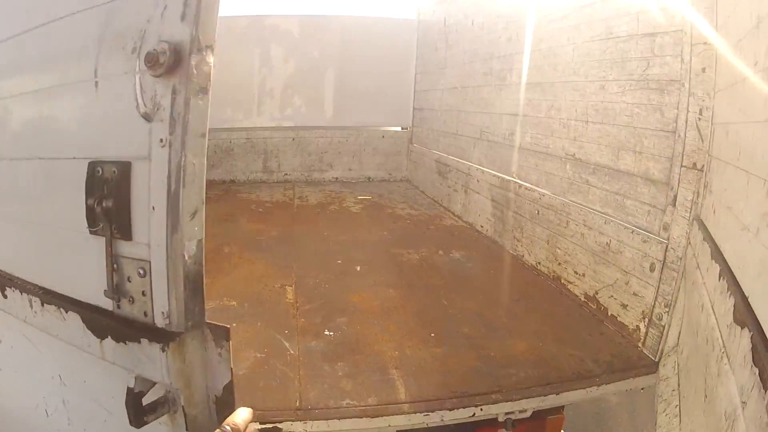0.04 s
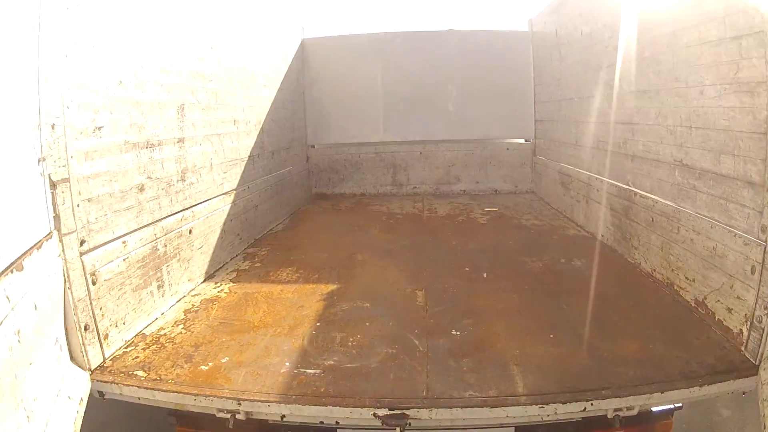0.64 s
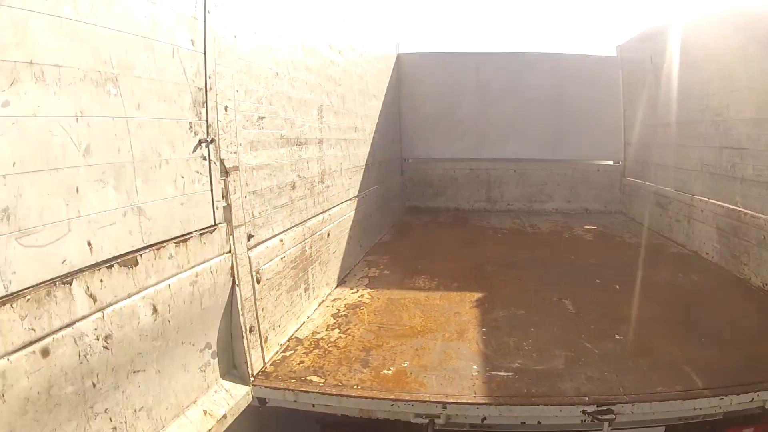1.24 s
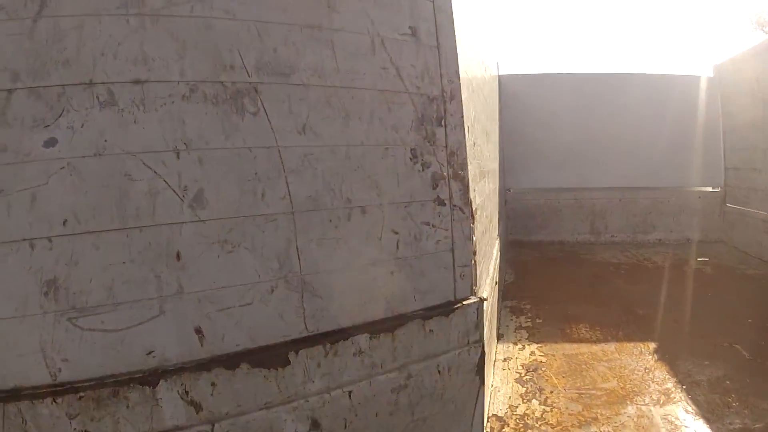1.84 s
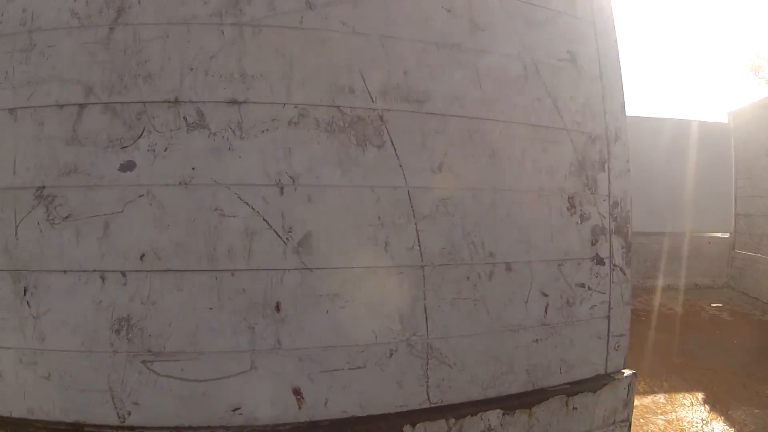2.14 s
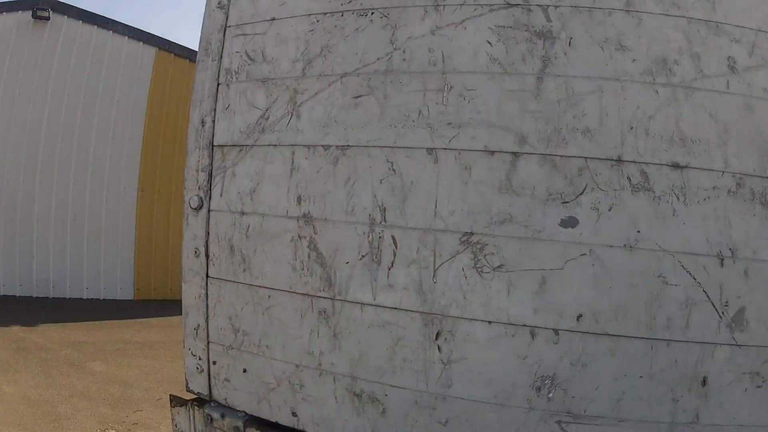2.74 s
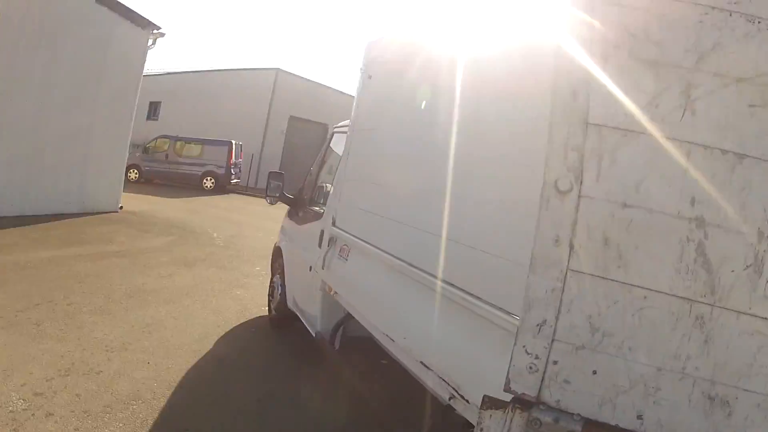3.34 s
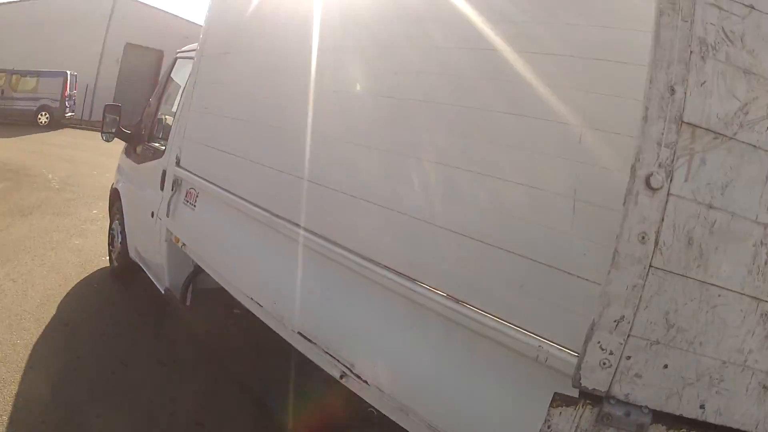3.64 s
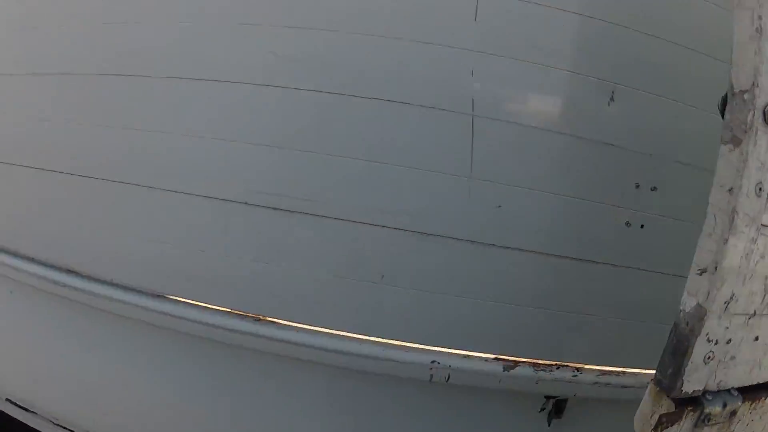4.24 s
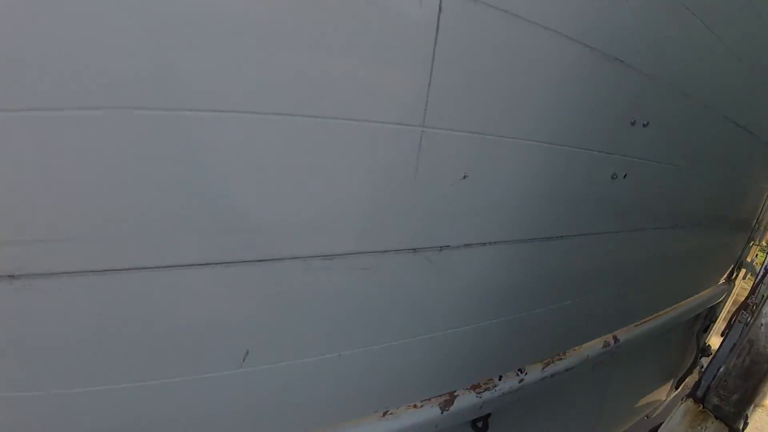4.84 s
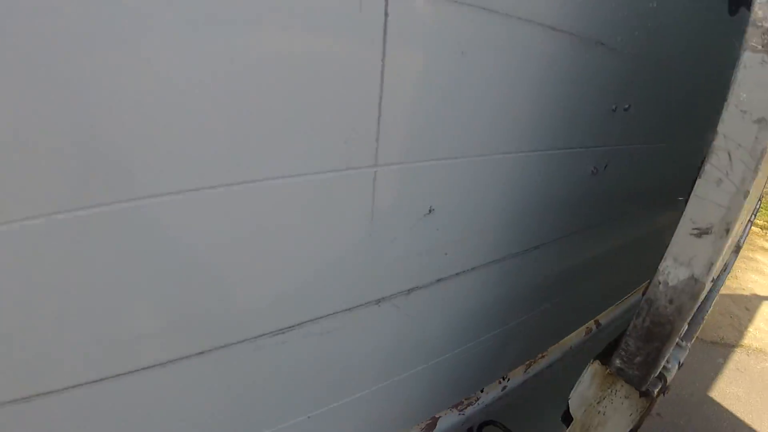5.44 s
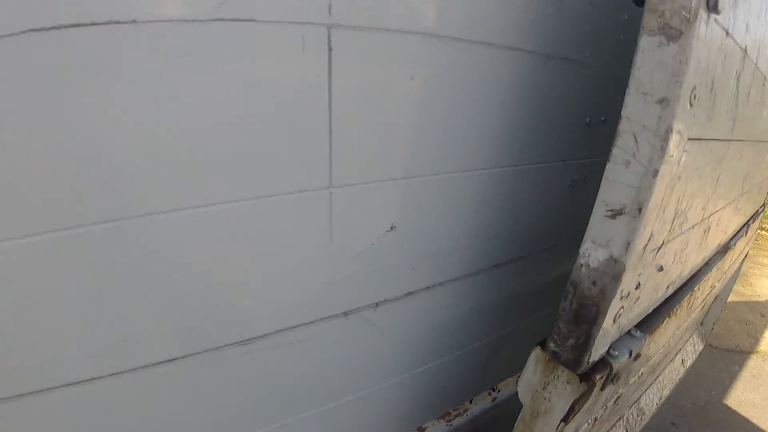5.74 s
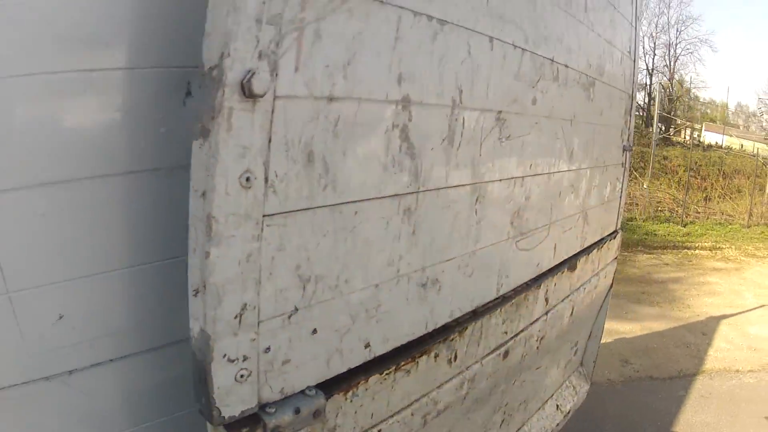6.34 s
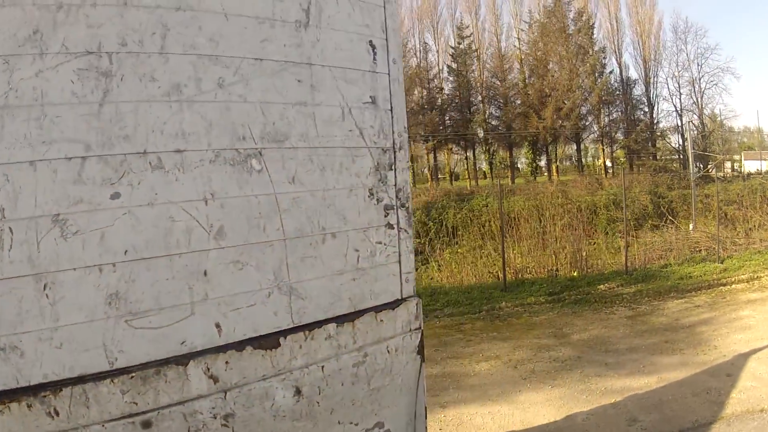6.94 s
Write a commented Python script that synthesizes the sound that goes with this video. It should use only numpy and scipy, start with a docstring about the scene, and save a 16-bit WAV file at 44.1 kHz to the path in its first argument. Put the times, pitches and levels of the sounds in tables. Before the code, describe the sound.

In a quiet yard, a truck's steel rear doors are unlatched close by: small clicks, a ringing bolt clank, a dull knock and a sharp snap. Someone walks a door open, each step a deep thump in the handheld microphone with a faint crunch of grit. The hinge grinds briefly, then the door bounces on its catch with a quick metallic chatter and a low boom, over a soft open-air rumble.

```python
"""A latch clicks and a steel bolt clanks home: a tipper truck's rear doors are being swung open
and latched back in a quiet yard. Each impact excites the damped modes of panels, bolt or hook,
and the empty load box reverberates. Hinges rub and grind by friction; flexing sheet steel booms.
Footfalls crunch on grit and thump through a small hand-carried camera, whose case resonances
colour everything, down to the steady rumble and hiss of the open air."""
import sys
import numpy as np
from scipy import signal
from scipy.fft import rfft, irfft
from scipy.io import wavfile

SR = 44100
rng = np.random.default_rng(int(sys.argv[2]) if len(sys.argv) > 2 else 0)


def wrap_up_sound(samples):
    """Save the sound to the file named by the first command line argument, as 16-bit audio."""
    columns = np.atleast_2d(samples).T
    # keep every value between -1 and 1, then stretch to whole-number steps
    tamed = np.clip(columns, -1, 1)
    steps = np.round(tamed * 32767).astype(np.int16)
    wavfile.write(sys.argv[1], SR, steps)


N = 308700
T = np.arange(N) / SR
HIT_T = T[:27000]   # time axis of one impact

# rattle spectrum of latch, bolt and hinge: f/Hz, relative density/dB
STEEL_SPECTRUM = [(120, -17.5), (450, -13.5), (750, -2), (950, -14.5), (1150, -1.5), (1450, -9), (1900, -3),
                  (2450, -2.5), (3000, -5), (3700, -5), (4300, -13.5), (7300, -14), (9400, -16.5),
                  (15500, -21)]
# modes of the door struck at the latch: f/Hz, level/dB, T60/s
DOOR_MODES = [(753, -24, 0.5), (1020, -26, 0.4), (1101.4, -13, 0.47), (1654, -18.5, .2), (1698, -13, 0.13),
              (1790, -13.5, 0.48), (2080, -15, .17), (2344, -13, 0.25), (2600, -12.5, .24),
              (2889, -21.5, 0.21), (3240, -19, 0.093), (3600, -19, .27), (8400, -26.5, 0.18),
              (9450, -28.5, 0.22), (10100, -34, 0.42)]
# the bolt hits its stop and rebounds: t/s, level/dB
BOLT_IMPACTS = [(.3695, -30.5), (.387, -40), (.451, -44.5)]
def bolt(free_s=.319, free_db=-41.5, slip_s=.345, gap_s=.0061, slip_db=-32.5, growth_db=.5):
    """Stick-slip friction: the bolt breaks free, slides in ever harder jerks and hits its stop."""
    out = np.zeros(N)
    release = contact(STEEL_SPECTRUM, DOOR_MODES, t60=.5, part_hz=2730, part_db=5, bass_db=-.5,
                      treble_db=-2, modes_db=2, box_db=-21, crack_db=-10.5, bolt_db=4.5)
    add(out, free_s, from_db(free_db) * release)
    for k in range(4):
        slip = contact(STEEL_SPECTRUM, DOOR_MODES, t60=.14, part_hz=2700, part_db=7.5, bass_db=.5,
                       treble_db=.5, modes_db=-2.5, box_db=-17, crack_db=-11.5, bolt_db=-2)
        add(out, slip_s + k * gap_s, from_db(slip_db + k * growth_db) * slip)
    for s, db in BOLT_IMPACTS:
        stop = contact(STEEL_SPECTRUM, DOOR_MODES, t60=.13, part_hz=750, part_db=6.5, bass_db=4.5,
                       treble_db=2, modes_db=2, box_db=-14, crack_db=-11.5)
        add(out, s, from_db(db) * stop)
    return out


# latch snaps, and one dull knock at 0.1455 s: t/s, level/dB, rattle T60/s, struck part f/Hz, bass/dB,
# treble/dB, hook/dB
LATCH_SNAPS = [(.086, -48.5, 0.12, 2830, 7, 2.5, -7), (.1455, -54, 0.046, 850, 16, -9, -24),
               (.568, -45.5, 0.19, 2600, -9, -1.5, 2), (1.7192, -33, 0.15, 1950, -2, -5, -4.5),
               (2.0505, -58, 0.04, 2700, -8, -2.5, 5), (3.43, -60, 0.2, 1500, 7, -11, -14),
               (3.968, -57.5, 0.23, 2470, 20, -1.5, -7), (4.952, -54.5, 0.023, 3620, 6, 8, -20),
               (5.163, -53.5, 0.19, 2400, 3, 3.5, -9), (5.637, -47, 0.22, 2420, -10, -6.5, -4.5)]
# modes of the loose hook: f/Hz, level/dB, undamped T60/s
FREE_HOOK_MODES = [(2490, -1.5, 0.059), (2440, 2.5, 0.16), (2507, 1.5, 0.08), (2750, -2, 0.18),
                   (2880, -7, 0.13), (3400, -10, .1), (3603, -10, 0.12), (8250, -21, 0.12),
                   (9120, -11, 0.13), (9640, -15.5, .11), (14650, -16, .11)]
def latches(free_rattle_t60=.18):
    """Damped free vibration: a latch snaps and its hook rings; a hand damps both alike."""
    out = np.zeros(N)
    for s, db, t60, part_hz, bass_db, treble_db, hook_db in LATCH_SNAPS:
        snap = contact(STEEL_SPECTRUM, DOOR_MODES, t60, part_hz, part_db=5.5, bass_db=bass_db,
                       treble_db=treble_db, modes_db=-12, box_db=-21, crack_db=-11)
        hook_modes = [(hz, level, free * t60 / free_rattle_t60) for hz, level, free in FREE_HOOK_MODES]
        hook = ring(hook_modes, spread_db=2.5)
        add(out, s, from_db(db) * (snap + from_db(hook_db) * hook))
    return out


# rattle spectrum of the side catch: f/Hz, relative density/dB
CATCH_SPECTRUM = [(120, -24), (450, -9), (750, -6.5), (1000, -9.5), (1350, 0.5), (1600, -6.5), (1950, -2),
                  (2450, -7.5), (3000, -8.5), (3600, -8), (4500, -12), (6000, -9.5), (9000, -20),
                  (15500, -26.5)]
# modes of the door struck at the catch: f/Hz, level/dB, T60/s
DOOR_CATCH_MODES = [(1142, -17.5, 0.67), (1412, -20, 0.9), (1800, -12.5, 0.75), (1936, -3, 0.2),
                    (2230, -9, 0.28), (2350, -12, 0.45), (2870, -22, 0.45), (3350, -19, 0.32),
                    (3634, -15, 0.36), (9189, -36, .29), (9970, -25, 0.5)]
# blows on the catch: t/s, level/dB, struck part f/Hz, treble/dB
CATCH_BLOWS = [(5.762, -35, 2430, 2.5), (5.829, -37, 1886, 2.5), (5.878, -48, 1935, -5)]
# tick, main hit, shudder: delay/s, level/dB, rattle T60/s, bass/dB, treble/dB, modes/dB, load box/dB
CHATTER = [(0, -4, 0.14, -0.5, 5.5, -15, -19), (.006, 1, 0.14, -3, 2, -6, -13),
           (.017, -1.5, .22, -15.5, -1.5, -0.5, -3)]
def side_catch():
    """Inelastic rebound: the open door bounces on its catch, chattering at each weaker blow."""
    out = np.zeros(N)
    for s, db, part_hz, blow_treble_db in CATCH_BLOWS:
        for delay, touch_db, t60, bass_db, treble_db, modes_db, box_db in CHATTER:
            touch = contact(CATCH_SPECTRUM, DOOR_CATCH_MODES, t60, part_hz, part_db=10,
                            bass_db=bass_db, treble_db=blow_treble_db + treble_db,
                            modes_db=modes_db, box_db=box_db, crack_db=3.5)
            add(out, s + delay, from_db(db + touch_db) * touch)
    return out


# rattle spectrum of a door leaf: f/Hz, relative density/dB
LEAF_SPECTRUM = [(100, 4), (230, 4.5), (450, 1.5), (700, -9.5), (900, -9.5), (1200, -11.5), (1900, -15.5),
                 (2600, -19.5), (4000, -36), (8000, -46), (12000, -19), (15500, -47)]
# knocks on a leaf: t/s, level/dB, rattle T60/s, struck part f/Hz, bass/dB
LEAF_KNOCKS = [(.785, -57, .08, 592, 4), (1.112, -49, 0.29, 1770, 8), (3.31, -59.5, 0.24, 165, 13.5),
               (5.699, -32.5, 0.15, 1339, -8)]
# the leaf touches, lands and rebounds: delay/s, level/dB
LEAF_BOUNCES = [(0, -3), (.008, 1), (.04, -10.5)]
def knocks():
    """Impact with rebound: a door leaf knocks dully, barely exciting its clear modes."""
    out = np.zeros(N)
    for s, db, t60, part_hz, bass_db in LEAF_KNOCKS:
        for delay, bounce_db in LEAF_BOUNCES:
            knock = contact(LEAF_SPECTRUM, DOOR_MODES, t60, part_hz, part_db=7.5, bass_db=bass_db,
                            treble_db=-.5, modes_db=-21, box_db=-16, crack_db=2, bolt_db=-34)
            add(out, s + delay, from_db(db + bounce_db) * knock)
    return out


# modes of the bolt: f/Hz, level/dB, T60/s
STEEL_BOLT_MODES = [(4200, -10, .06), (4620, -3, .07), (5480, 0, .065), (6610, 0, .065), (7400, -3, .06),
                    (9400, -12, .06)]
# reverberation of the empty load box: f/Hz, relative density/dB
BOX_SPECTRUM = [(120, 6), (250, 9), (450, 9.5), (700, -4), (1200, 2.5), (1900, 0.5), (2500, -7.5),
                (3500, -21), (5000, -20.5), (8000, -23.5), (10300, -14), (15500, -19)]
def contact(spectrum, modes, t60, part_hz, part_db, bass_db, treble_db, modes_db, box_db, crack_db,
            bolt_db=-24, crack_t60=.018, attack_s=.002, box_swell_s=.013, box_t60=.57):
    """Impulse response of the door: a crack, a rattle, ringing modes and the reverberant load box."""
    size = len(HIT_T)
    envelope = decay(t60) * grainy(size, depth_db=1.5, grain_s=.0012)
    envelope += from_db(crack_db) * decay(crack_t60)
    rattle = noise(spectrum, size, bass_db, treble_db, part_hz, part_db) * envelope
    tones = from_db(modes_db) * ring(modes, spread_db=2.23)
    tones += from_db(bolt_db) * ring(STEEL_BOLT_MODES, spread_db=2.5)
    box = noise(BOX_SPECTRUM, size, bass_db / 2, treble_db / 2, part_hz, part_db)
    box *= decay(box_t60) * (1 - np.exp(-HIT_T / box_swell_s))
    attack = 1 - np.exp(-HIT_T / attack_s)
    return (rattle + tones + from_db(box_db) * box) * attack


# booms of the sheet steel: t/s, f/Hz, level/dB, rise/s, T60/s
SHEET_BOOMS = [(0.386, 255.3, -44, 0.014, 0.35), (1.108, 139, -36.5, 0.0064, 0.26),
               (3.306, 130, -38, 0.02, 0.19), (5.35, 345, -43, 0.025, 0.26),
               (5.905, 237.3, -41, 0.01, 0.56), (5.93, 485, -57, 0.04, 0.53)]
def booms(waver_db=-9):
    """Flexural vibration: a sheet swells on one low mode and rings out, a little unsteadily."""
    out = np.zeros(N)
    for s, hz, db, rise, t60 in SHEET_BOOMS:
        swell = np.minimum(HIT_T / rise, 1) ** 2
        fall = np.minimum(decay(t60) * 1000 ** (rise / t60), 1)   # begins once the rise is over
        waver = 1 + from_db(waver_db) * noise([(30, 25.5), (200, -17), (1000, -69.5)], len(HIT_T))
        add(out, s, from_db(db) * swell * fall * waver * np.sin(2 * np.pi * hz * HIT_T))
    return out


# runs of hinge slips: t/s, duration/s, level/dB, struck part f/Hz
HINGE_SCRAPES = [(5.028, .105, -55.5, 2280), (5.591, .04, -57.5, 1480)]
def hinge_grinding(slips=4, uneven_db=2):
    """Stick-slip friction: a dry hinge gives way at uneven moments, each slip a small impact."""
    out = np.zeros(N)
    for s, length, db, part_hz in HINGE_SCRAPES:
        for k in range(slips):
            slip = contact(STEEL_SPECTRUM, DOOR_MODES, t60=.091, part_hz=part_hz, part_db=6,
                           bass_db=14, treble_db=-.5, modes_db=2.5, box_db=-11.5, crack_db=-6)
            onset = s + length * (k + rng.uniform(0, .5)) / slips
            add(out, onset, from_db(db + uneven_db * rng.standard_normal()) * slip)
    return out


# door swings: centre t/s, half-width/s, level/dB
DOOR_SWINGS = [(2.696, 0.34, -71.5), (4.398, .2, -72), (6.609, 0.19, -77)]
# the two bands in which the hinge sings: f/Hz, relative density/dB
RUB_SPECTRUM = [(1700, -22), (2100, -10), (2210, 1), (2400, -14.5), (3300, -20), (3780, -11), (4200, -28),
                (9000, -36)]
def hinge_rubbing():
    """Sliding friction: a soft ringing hiss swells and fades with each swing of a door."""
    swell = sum(from_db(db) * gaussian(T - s, half) for s, half, db in DOOR_SWINGS)
    return swell * noise(RUB_SPECTRUM, N) * grainy(N, depth_db=1.5, grain_s=.025)


# chirps of the camera case: t/s, level/dB, half-width/s
CASE_CHIRPS = [(0.366, -29.5, 0.0014), (0.3719, -16, 0.0021), (0.389, -39.5, 0.0059), (0.404, -43, 0.01),
               (0.473, -47, 0.0032)]
# tones at which the case rings: f/Hz, level/dB
CASE_TONES = [(3600, 0.5), (3760, -2.5), (8350, -12)]
def case_chirps():
    """Resonance: short shrill chirps as the camera case rings with the bolt's clanks."""
    swell = sum(from_db(db) * gaussian(T - s, half) for s, db, half in CASE_CHIRPS)
    return swell * sum(from_db(db) * np.sin(2 * np.pi * hz * T) for hz, db in CASE_TONES)


# footfalls: heel t/s, heel level/dB, sole level/dB, sway f/Hz, grit level/dB
FOOTFALLS = [(1.214, -31.5, -31, 41, -76), (1.727, -20, -34, 44.1, -67), (2.236, -18, -21, 42.5, -62),
             (2.784, -13.5, -24.5, 39.4, -56.5), (3.293, -13.5, -22, 42.6, -61),
             (3.797, -8, -20, 42.3, -47.5), (4.297, -14.5, -27, 37.1, -51), (4.83, -28, -27.5, 42.2, -67),
             (5.548, -26.5, -25, 46, -68), (6.431, -27.5, -23.5, 44, -70)]
# leg swing, heel strike, sole roll and toe push of a stride: delay/s, rising half-width/s
STRIDE_PHASES = [(-.085, 0.033), (0.019, 0.018), (.092, 0.024), (0.159, 0.016)]
# tugs on a door that jolt the camera: t/s, level/dB, rising half-width/s
DOOR_TUGS = [(0.148, -32.5, 0.022), (0.267, -32.5, 0.057), (1.126, -36.5, 0.027), (5.198, -31.5, .034),
             (5.742, -22.5, 0.02)]
TYPICAL_HEEL_DB = -18
def camera_thumps(tug_hz=43, swing_db=-39.5, push_db=-34, fall_ratio=1.3, overtone_db=-28,
                  thud_db=-33, whine_hz=12000, whine_db=-34):
    """Shock excitation: each jolt rocks the camera for a few slow cycles, with a dull thud."""
    jolts = [(s, db, tug_hz, half) for s, db, half in DOOR_TUGS]
    for s, heel_db, sole_db, hz, _ in FOOTFALLS:
        vigour_db = .41 * (heel_db - TYPICAL_HEEL_DB)   # swing and push partly follow the heel
        levels = swing_db + vigour_db, heel_db, sole_db, push_db + vigour_db
        jolts += [(s + delay, db, hz, half) for (delay, half), db in zip(STRIDE_PHASES, levels)]
    sway, thud = np.zeros(N), np.zeros(N)
    for s, db, hz, half in jolts:
        near = slice(max(int((s - .25) * SR), 0), int((s + .25) * SR))
        t = T[near] - s
        pulse = from_db(db) * gaussian(t, half * np.where(t < 0, 1, fall_ratio))
        phase = 2 * np.pi * hz * t
        overtone = from_db(overtone_db - db) * pulse * np.cos(2 * phase)
        sway[near] += pulse * (np.cos(phase) + overtone)
        thud[near] += from_db(thud_db) * pulse
    thud *= noise([(40, -5), (72, 3), (100, -10.5), (300, -23), (1500, -56)], N)
    # a faint recorder whine flutters with each low thump
    whine = from_db(whine_db) * sway * np.sin(2 * np.pi * whine_hz * T)
    return sway + thud + whine


# spectrum of grit and of cloth: f/Hz, relative density/dB
CRUNCH_SPECTRUM = [(200, 10.5), (1100, 5), (2500, 2.5), (4000, -10.5), (9000, -14.5), (15500, -23.5)]
def grit(gap_s=.034, loss_db=2.5, t60=.04):
    """Granular crackle: stones crack under the heel, then more weakly as the sole rolls down."""
    cracks = np.zeros(N)
    for s, *_, db in FOOTFALLS:
        for k in range(4):
            onset = s + k * gap_s * rng.uniform(.93, 1.07)
            add(cracks, onset, from_db(db - k * loss_db) * decay(t60))
    return cracks * noise(CRUNCH_SPECTRUM, N)


def clothes(rest_db=-73, step_db=-67.5, delay_s=.11, half_s=.14):
    """Friction noise: cloth rustles softly all along and swells with each step."""
    cloth = noise(CRUNCH_SPECTRUM, N, bass_db=-10, peak_hz=2200, peak_db=5, peak_octaves=.024)
    swells = np.zeros(N)
    for s, heel_db, *_ in FOOTFALLS:
        vigour_db = .26 * (heel_db - TYPICAL_HEEL_DB)
        swells += from_db(step_db + vigour_db) * gaussian(T - s - delay_s, half_s)
    return np.hypot(from_db(rest_db), swells) * cloth * grainy(N, depth_db=3, grain_s=.018)


# open air: f/Hz, relative density/dB
AIR_SPECTRUM = [(15, 7), (40, 14.5), (60, 10.5), (90, -3), (220, -3.5), (400, -10), (700, -18.5),
                (1500, -24), (2200, -23.5), (2700, -29), (4500, -27.5), (7500, -32), (9500, -44),
                (12000, -29.5), (15500, -48.5)]
def yard_air(level_db=-51.5):
    """Stationary ambient noise: a low outdoor rumble under a faint hiss."""
    return from_db(level_db) * noise(AIR_SPECTRUM, N)


def ring(modes, spread_db):
    """Modal superposition: one blow starts damped sinusoids of random strength and sign."""
    strengths = from_db(rng.normal(0, spread_db, len(modes))) * rng.choice([-1, 1], len(modes))
    return sum(strength * from_db(db) * decay(t60) * np.sin(2 * np.pi * hz * HIT_T)
               for strength, (hz, db, t60) in zip(strengths, modes))


def noise(spectrum, size, bass_db=0, treble_db=0, peak_hz=1000, peak_db=0, peak_octaves=.25,
          bass_hz=900, treble_hz=3600):
    """Spectral shaping: coloured noise of unit rms passes through two shelves and one resonance."""
    hz = np.maximum(np.fft.rfftfreq(size, 1 / SR), 1)
    points = np.array(spectrum)
    gain = from_db(np.interp(np.log(hz), np.log(points[:, 0]), points[:, 1]))
    gain /= np.sqrt(np.mean(gain ** 2))
    shelves = bass_db / (1 + (hz / bass_hz) ** 2) + treble_db / (1 + (treble_hz / hz) ** 2)
    peak = peak_db / (1 + (np.log2(hz / peak_hz) / peak_octaves) ** 2)
    return irfft(rfft(rng.standard_normal(size)) * gain * from_db(shelves + peak), size)


def grainy(size, depth_db, grain_s):
    """Random amplitude modulation: a gain of unit rms jumps from one tiny contact to the next."""
    grain = (np.arange(size) / SR / grain_s).astype(int)
    gain = from_db(depth_db * np.clip(rng.standard_normal(size), -2, 2))[grain]
    return gain / np.sqrt(np.mean(gain ** 2))


def decay(t60):
    """Exponential decay of 60 dB in t60 seconds."""
    return np.exp(-np.log(1000) * HIT_T / t60)


def gaussian(t, half_width):
    """Gaussian pulse, down to 1/e at one half-width from its centre."""
    return np.exp(-(t / half_width) ** 2)


def from_db(db):
    """Level to amplitude ratio."""
    return 10 ** (np.asarray(db) / 20)


def add(out, s, sound):
    """Superpose a sound, starting at s seconds."""
    start = round(s * SR)
    out[start:start + len(sound)] += sound[:N - start]


def scene():
    """Linear superposition of doors, walker and yard at one microphone."""
    doors = latches() + bolt() + hinge_grinding() + hinge_rubbing() + knocks() + side_catch() + booms()
    return (doors + case_chirps() + camera_thumps() + grit() + clothes() + yard_air())[None]


# peaks and notches of the camera case: f/Hz, bandwidth/Hz, gain/dB
CASE_RESONANCES = [(2550, 600, 2.5), (3663, 300, 6.5), (6010, 890, -13.5), (8380, 380, 9.5),
                   (9636, 890, 11.5), (11850, 2100, -9.5), (14650, 1100, 10)]
def record(dry):
    """Resonance and antiresonance: the camera case colours the sound; a low-pass cuts the top."""
    for hz, width, db in CASE_RESONANCES:
        gain = from_db(db / 2)
        damping = np.tan(np.pi * width / SR)
        tuning = -2 * np.cos(2 * np.pi * hz / SR)
        numerator = [1 + damping * gain, tuning, 1 - damping * gain]
        denominator = [1 + damping / gain, tuning, 1 - damping / gain]
        dry = signal.lfilter(numerator, denominator, dry)
    low_pass = signal.ellip(10, .3, 80, 15700, fs=SR, output="sos")
    return signal.sosfilt(low_pass, dry)


dry = scene()
out = record(dry)
wrap_up_sound(out)
```